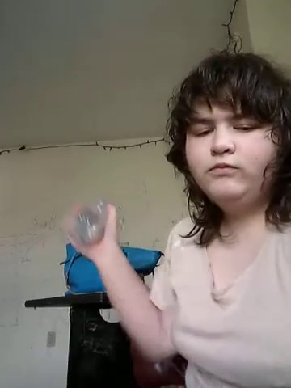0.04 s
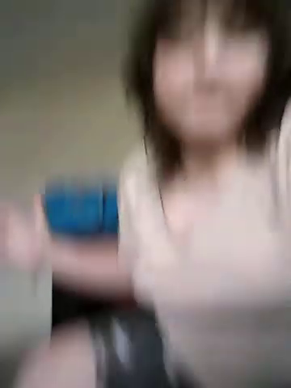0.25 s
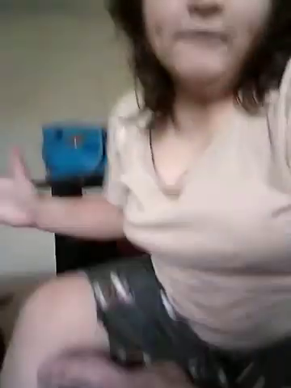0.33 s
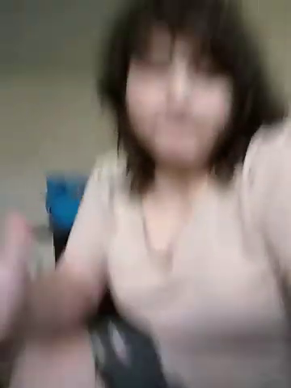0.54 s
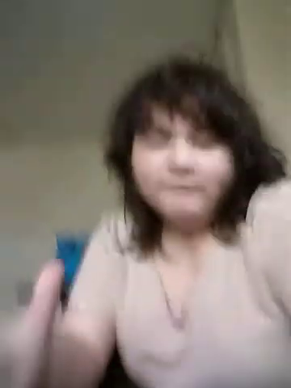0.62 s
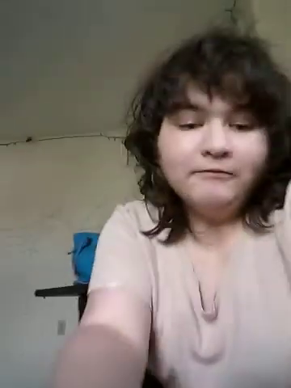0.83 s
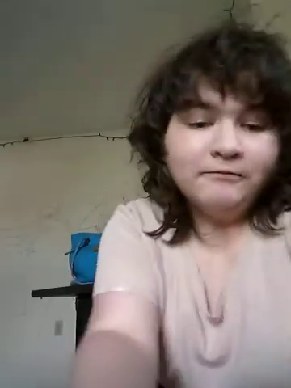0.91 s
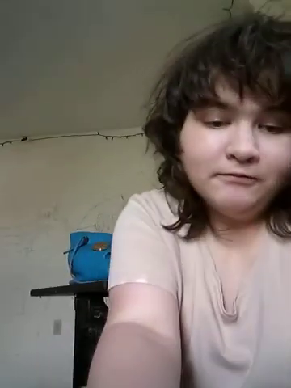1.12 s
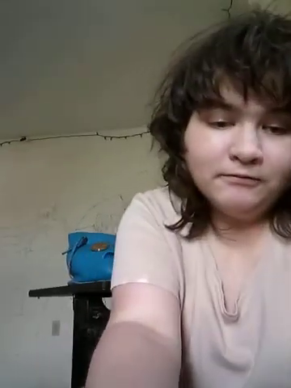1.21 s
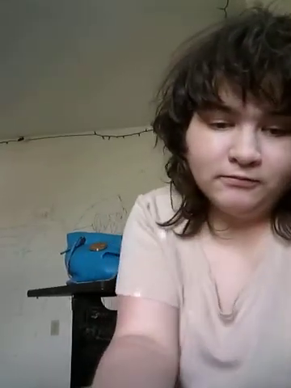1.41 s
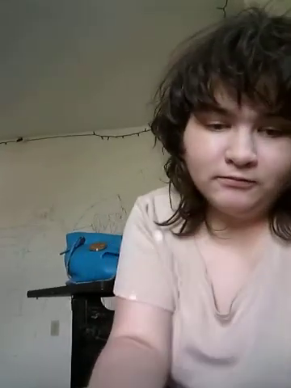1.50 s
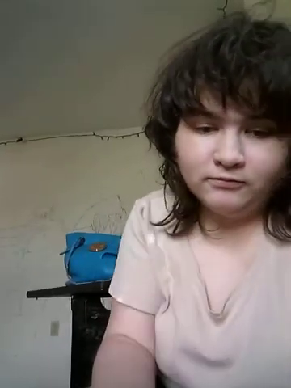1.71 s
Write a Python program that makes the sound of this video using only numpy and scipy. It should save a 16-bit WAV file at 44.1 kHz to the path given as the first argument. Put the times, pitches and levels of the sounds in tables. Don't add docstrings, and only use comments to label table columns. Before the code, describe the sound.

An empty plastic bottle knocks hard against a handheld microphone, with crackly snaps and low handling thumps

```python
import sys
import numpy as np
from scipy import signal
from scipy.fft import rfft, irfft
from scipy.io import wavfile
from scipy.ndimage import uniform_filter1d

SR = 44100
rng = np.random.default_rng(int(sys.argv[2]) if len(sys.argv) > 2 else 0)


def materialize(psi):
    bounded = np.clip(np.atleast_2d(psi).T, -1, 1)
    quanta = np.round(bounded * 32767).astype(np.int16)
    wavfile.write(sys.argv[1], SR, quanta)


def attenuation_scalar(level_db):
    decades = np.asarray(level_db, float) / 20
    return 10 ** decades


N = 77175


def read(points, hz):
    point_hz, point_db = np.transpose(points)
    return np.interp(np.log(hz + 1), np.log(point_hz + 1), point_db)


def equalize(points, x):
    return irfft(rfft(x) * attenuation_scalar(read(points, np.fft.rfftfreq(N, 1 / SR))), N)


def coloured(points, x):
    y = equalize(points, x)
    return y / np.std(y)


def add(mix, start_s, sound):
    part = mix[round(start_s * SR):][:len(sound)]
    part += sound[:len(part)]


def ring(hz, t60, rise):
    t = np.arange(round(0.3 * SR)) / SR
    swell = 1 - np.exp(-t / rise)
    return np.sin(2 * np.pi * hz * t) * attenuation_scalar(-60 * t / t60) * swell


def wobble(size, db):
    w = uniform_filter1d(uniform_filter1d(rng.standard_normal(N), size), size)
    return attenuation_scalar(db * w / np.std(w))


def spell(start, end, fade, db):
    return attenuation_scalar(db) * np.interp(np.arange(N) / SR, [start, start + fade, end - fade, end], [0, 1, 1, 0])


def level_curve(points):
    return attenuation_scalar(np.interp(np.arange(N) / SR, *np.transpose(points)))


def room():
    # frequency in Hz, density in dB per Hz.
    air_spectrum = [(18, -29.5), (30, -8), (76, -2), (118, -0.5), (223, 4), (423, -5.5), (858, -2.5),
                    (2000, -28.5), (7000, -52.5), (9100, -83.5), (15400, -120)]
    # time in seconds, gain in dB.
    gain_points = [(0, 10.5), (.16, 14), (.2, 15), (.3, 6), (.39, -1), (.5, -3), (.64, -2.5), (.8, 1.5),
                   (.95, -1), (1.55, -4), (1.75, -8)]
    hum_hz, hum_width_hz = 52.8, 9
    t = np.arange(N) / SR
    pole = np.exp(-np.pi * hum_width_hz / SR)
    noise = rng.standard_normal(N) + 1j * rng.standard_normal(N)
    drift = signal.lfilter([1 - pole], [1, -pole], noise)
    hum = (np.exp(2j * np.pi * hum_hz * t) * (1 + 0.12 * drift / np.std(drift))).real
    air = coloured(air_spectrum, rng.standard_normal(N)) * wobble(size=900, db=1.5)
    return level_curve(gain_points) * (attenuation_scalar(-46) * air + attenuation_scalar(-47) * hum)


def self_noise():
    # time in seconds, level in dB.
    hiss_points = [(0, -65), (.17, -61), (.3, -78), (1.4, -79.5), (1.75, -73)]
    spectrum = [(3000, -37.0), (7000, -4), (10000, -7.0), (16000, -6.0)]  # Hz, dB per Hz
    return level_curve(hiss_points) * coloured(spectrum, rng.standard_normal(N))


def sleeve():
    # frequency in Hz, density in dB per Hz.
    cloth_spectrum = [(600, -28.5), (1500, 6), (2100, 2), (2700, 0), (3500, -4.5), (5000, -22), (7500, -28),
                      (16000, -47)]
    # start in seconds, end in seconds, fade in seconds, level in dB.
    rustle_spells = [
        (-.1, 0.224, 0.02, -49.5),
        (0.236, 0.479, 0.019, -65.5),
        (0.609, 0.661, 0.057, -54),
        (0.698, 0.848, 0.013, -56.5),
        (0.895, 1.412, 0.21, -66),
        (0.867, 0.946, 0.027, -56.5),
        (0.887, 1.107, 0.14, -74),
    ]
    cloth = coloured(cloth_spectrum, rng.standard_normal(N)) * wobble(size=400, db=1.5)
    return sum(spell(*row) for row in rustle_spells) * cloth


def rubs():
    # start in seconds, rise in seconds, fall in seconds, body in dB, hiss in dB.
    strokes = [(-.1, .12, .2, -50, -80), (0.184, 0.0013, 0.0039, -13.5, -30.5),
               (0.1889, 0.00083, 0.00095, -19, -31), (0.1943, .002, 0.0018, -32, -47),
               (0.197, 0.0028, 0.025, -22.5, -50), (0.214, 0.015, 0.051, -25.5, -50),
               (0.651, 0.035, 0.03, -35, -52.5), (0.691, 0.016, 0.0099, -26.5, -52),
               (0.714, 0.0082, 0.04, -38, -72), (0.782, 0.0018, 0.0038, -30, -53),
               (0.788, 0.0032, 0.029, -44, -66), (0.837, 0.0028, 0.026, -38, -59),
               (0.857, 0.013, 0.015, -43, -62), (0.885, 0.0049, 0.01, -44, -85),
               (0.897, 0.0021, 0.0023, -42, -79), (0.9003, 0.00089, 0.0079, -38, -79),
               (1.19, 0.0053, 0.043, -77, -69.5)]
    # frequency in Hz, density in dB per Hz.
    body_spectrum = [(250, -38), (500, 14.5), (1000, 9), (1700, 8.5), (3000, 4), (4800, -4.5),
                     (7500, -21.5), (16000, -100)]
    # frequency in Hz, density in dB per Hz.
    hiss_spectrum = [(4000, -37), (6000, -6), (7500, 8.5), (9500, -2), (14000, 4.5), (16000, -9)]
    dull_hz, brighten = 2000, 0.81
    t = np.arange(N) / SR
    slips = (rng.random(N) < 1500 / SR) * rng.random(N)
    grain = rng.standard_normal(N) * (1 + 3 * slips) * wobble(size=40, db=2)
    body, hiss = coloured(body_spectrum, grain), coloured(hiss_spectrum, grain)
    treble = signal.sosfiltfilt(signal.butter(2, dull_hz, "high", fs=SR, output="sos"), body)
    dull = body - treble
    out = np.zeros(N)
    for start, rise, fall, db, hiss_db in strokes:
        ramp = np.interp(t, [start, start + rise, start + rise + fall], [0, 1, 0])
        pressure = np.sin(np.pi / 2 * ramp) ** 1.2
        skin = dull + pressure ** brighten * treble
        out += pressure * (attenuation_scalar(db) * skin + attenuation_scalar(hiss_db) * hiss)
    return out


def ticks():
    # start in seconds, level in dB, pitch in Hz.
    tick_events = [(0.141, -21, 4060), (0.23, -25, 3030), (0.2595, -18.5, 3970), (.306, -32.5, 1460),
                   (0.3784, -5, 3800), (.3900, -22, 2000), (0.3917, -27.5, 3460), (0.4052, -30, 3240),
                   (0.1829, -15.5, 1520), (.1848, -2, 8800), (0.1846, -8, 2130), (0.188, -22, 2500),
                   (0.215, -23, 2340), (0.393, -19.5, 980), (.6875, -17.5, 4500), (0.708, -31, 2640),
                   (0.7282, -12, 3520), (.7855, -18, 4070), (.7928, -21, 3280), (0.8423, -17, 3100),
                   (.8645, -27, 2800), (0.8756, -38, 3300), (.9048, -22.5, 2000), (1.309, -40.5, 1120),
                   (.6468, -21.5, 2000), (.6516, -25.5, 2200), (1.1866, -36.5, 2000), (.8452, -31, 1520),
                   (1.4172, -38, 2000), (0.378, -21, 11500), (.2005, -19.5, 2600), (.2055, -21.5, 5000),
                   (.2405, -25.5, 3000), (0.4058, -19, 970), (0.4257, -43, 3170), (0.4268, -27, 1096),
                   (.446, -49.5, 3150), (0.564, -48, 2540), (0.6453, -55, 6000), (0.7345, -31, 2200),
                   (0.738, -38, 8000), (.759, -32, 7700), (.766, -34, 2060), (.838, -39, 2050),
                   (0.869, -27, 2920), (0.8889, -24, 1800), (0.8985, -25.5, 2000), (1.2377, -36.5, 2000),
                   (1.411, -41.5, 4033), (1.573, -55, 2500), (1.66, -56, 1219), (1.687, -49, 1503),
                   (1.737, -41, 1236)]
    out, t = np.zeros(N), np.arange(500) / SR
    for start, db, hz in tick_events:
        cycles = ring(hz, t60=7 / hz, rise=0.00012)[:len(t)]
        puff = uniform_filter1d(rng.standard_normal(len(t)), size=6) * attenuation_scalar(-60 * t / 0.002)
        add(out, start, attenuation_scalar(db) * (cycles + 0.071 * puff))
    return out


def grip():
    # frequency in Hz, density in dB per Hz.
    grip_spectrum = [(35, -25), (55, -1), (200, 1.5), (450, -5.5), (900, -20), (2000, -58), (16000, -100)]
    # start in seconds, end in seconds, fade in seconds, level in dB.
    grip_spells = [
        (0.181, 0.276, 0.0096, -19),
        (0.269, 0.491, 0.042, -42.5),
        (0.712, 0.932, 0.01, -39.5),
        (1.592, 1.85, 0.036, -45.5),
    ]
    lumps = coloured(grip_spectrum, rng.standard_normal(N) * wobble(size=200, db=3.5))
    return sum(spell(*row) for row in grip_spells) * lumps


def knocks():
    knock_starts = [.1839, .2015, .2149, .2581, .3794, .6467, .6515, .6972, .7035, .7092, .7288, .7830,
                    .7846, .7856, .7950, .8422, .8912, .9021, .9108, .9165, .9225, 1.1842, 1.4168, 1.6164]
    # ring level in dB, ring pitch in Hz, decay t60 in seconds, crack level in dB.
    knock_rows = [(-3, 904, 0.0096, -8.5), (-12.5, 400, 0.023, -32), (-21.5, 1260, 0.034, -10),
                  (-3, 690, 0.0094, -33), (6, 983, 0.0044, -37), (-15, 700, 0.0056, -48),
                  (-18, 960, 0.0043, -55), (-18.5, 510, 0.042, -32), (-17.5, 350, 0.023, -46),
                  (-7, 1057, 0.017, -20.5), (-13, 1050, .01, -36), (-20, 1267, 0.0093, -29),
                  (-11.5, 520, 0.025, -47.5), (-7.5, 1120, .017, -58), (-21.5, 590, 0.056, -42),
                  (-32, 1315, 0.0096, -22), (-24, 3000, .007, -43), (-15.5, 2580, 0.0063, -43),
                  (-28.5, 1090, 0.021, -70), (-46, 450, 0.016, -62), (-26, 500, 0.013, -59),
                  (-23, 1220, 0.01, -40), (-20, 1080, 0.0051, -38), (-13, 980, 0.003, -53)]
    # ratio to the ring pitch, level in dB.
    wall_modes = [
        (1, 0),
        (1.9, -28),
        (3.4, -32.5),
        (4.3, -36),
    ]
    # frequency in Hz, density in dB per Hz.
    crack_spectrum = [(300, -15.5), (800, 11), (2000, 14), (4500, -13), (7600, -3.5), (10500, -16.5),
                      (14000, -21.5), (16000, -28)]
    out, t = np.zeros(N), np.arange(900) / SR
    noise = coloured(crack_spectrum, rng.standard_normal(N))
    click = coloured(crack_spectrum, np.arange(N) == 0)
    snap = np.roll(click, 450)[:900] * np.hanning(900) ** 40
    snap = snap / abs(snap).max()
    crackle_shape = attenuation_scalar(-60 * t / 0.017) * (1 - np.exp(-t / 0.001735))
    for start, (db, hz, t60, crack_db) in zip(knock_starts, knock_rows):
        for ratio, mode_db in wall_modes:
            if hz * ratio < SR / 8:
                mode = ring(hz * ratio, t60 / ratio ** 0.5, rise=0.00049 / ratio)
                add(out, start, -attenuation_scalar(db + mode_db) * mode)
        crackle = crackle_shape * noise[round(start * SR):][:len(t)]
        add(out, start - 0.0008, attenuation_scalar(crack_db - 5.5) * crackle)
        add(out, start + 0.0006 - 450 / SR, -attenuation_scalar(crack_db + 6) * snap)
    return out


def thumps():
    # start in seconds, level in dB, pitch in Hz, decay t60 in seconds,
    # push direction (1 or -1).
    thump_events = [(0.19, -2, 85, 0.076, 1), (0.19, -2.5, 196, 0.025, -1), (0.21, -2, 87, 0.039, 1),
                    (0.2411, 1.5, 220, 0.0098, 1), (0.26, 3.5, 170.2, 0.034, -1), (0.26, -7, 66, 0.097, 1),
                    (0.39, -9, 85, 0.092, 1), (0.38, -4, 140, 0.02, -1), (0.43, -22, 135, 0.083, -1),
                    (0.467, -30.5, 71, 0.15, 1), (1.641, -38.5, 52, 0.6, 1), (0.7032, -12.5, 199, 0.07, 1),
                    (.7130, -9.5, 73, 0.076, 1), (0.727, -19.5, 142, 0.095, 1),
                    (.866, -28.5, 106, 0.045, -1), (0.931, -43, 130, 0.048, 1),
                    (1.1, -22.5, 118, 0.076, -1), (0.86, -27, 126, 0.075, 1), (.51, -42, 120, .1, 1),
                    (0.7432, -22, 67, .1, 1), (0.8447, -19.5, 92, 0.048, 1), (1.103, -38.5, 109, 0.2, 1),
                    (1.185, -29.5, 304, 0.024, 1), (1.418, -27.5, 200, 0.018, -1),
                    (1.475, -32, 145, 0.033, 1), (1.618, -27.5, 253, 0.061, -1),
                    (1.62, -27.5, 126, 0.053, 1), (0.6467, -21, 214, 0.021, 1)]
    out = np.zeros(N)
    for start, db, hz, t60, way in thump_events:
        add(out, start, np.sign(way) * attenuation_scalar(db) * ring(hz, t60, rise=0.00038))
    return out


def whine():
    tone = np.sin(2 * np.pi * 2610 * np.arange(N) / SR)
    return spell(start=1.2, end=1.5, fade=0.4, db=-73) * tone * wobble(size=300, db=2.5)


def small_room(hits):
    t = np.arange(8000) / SR
    dark = signal.lfilter([1], [1, -1.7, 0.73], rng.standard_normal(8000))
    tail = dark * attenuation_scalar(-60 * t / 0.095) * (t > 0.003)
    return signal.fftconvolve(hits, tail / np.linalg.norm(tail))[:N]


def scene():
    hits = rubs() + ticks() + knocks()
    background = room() + self_noise()
    handling = sleeve() + grip() + thumps() + whine()
    return (background + handling + hits + attenuation_scalar(-28.0) * small_room(hits))[None]


def low_pass(x):
    return signal.sosfilt(signal.butter(12, 16500, fs=SR, output="sos"), x)


def record(dry):
    # frequency in Hz, gain in dB.
    mic_response = [(5000, 0), (6300, -4), (7500, -10), (9000, 0)]
    dipped = equalize(mic_response, dry)
    low_cut = signal.butter(4, 44, "high", fs=SR, output="sos")
    cut = signal.sosfiltfilt(low_cut, dipped)
    band_edge = signal.firwin(255, 16200, fs=SR)[None]
    return low_pass(signal.oaconvolve(cut, band_edge, "same"))


dry = scene()
out = record(dry)
materialize(out)
```